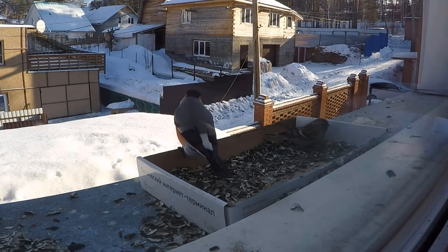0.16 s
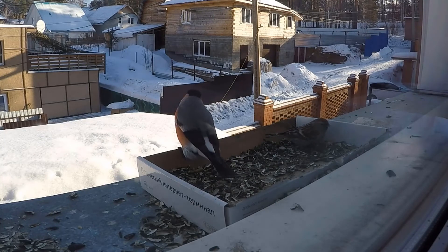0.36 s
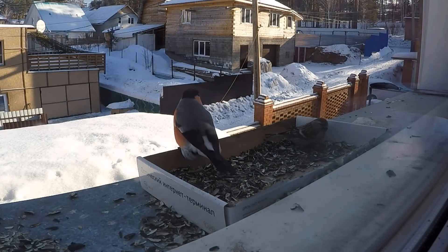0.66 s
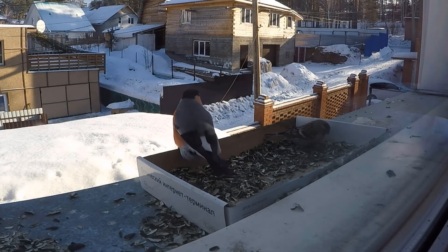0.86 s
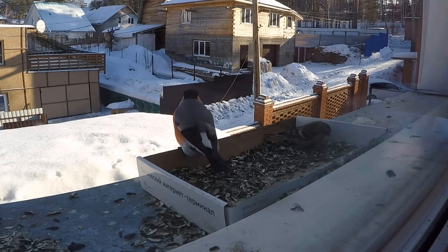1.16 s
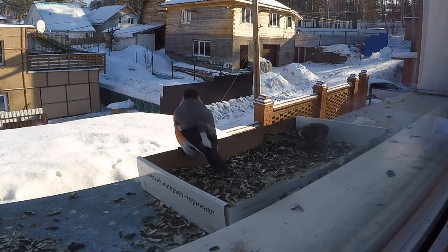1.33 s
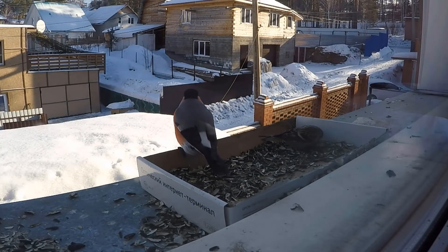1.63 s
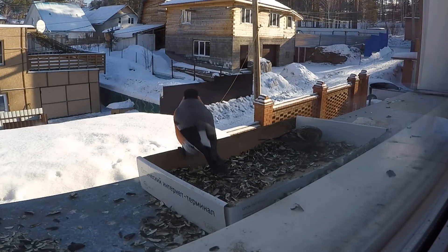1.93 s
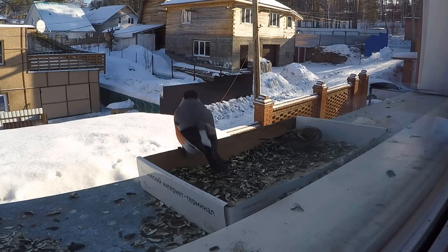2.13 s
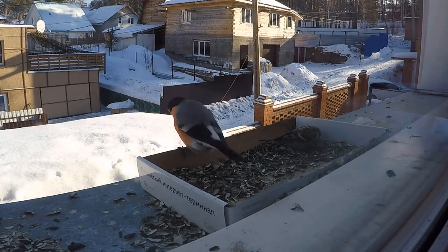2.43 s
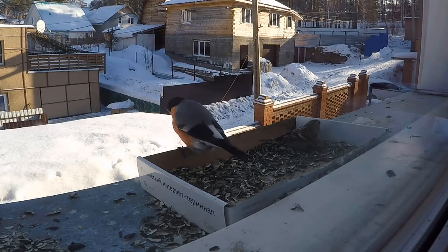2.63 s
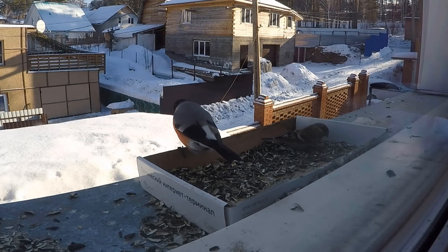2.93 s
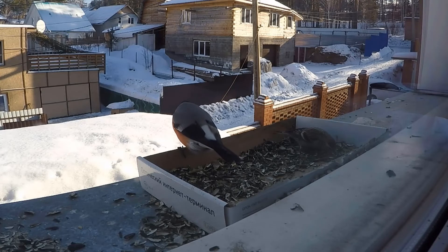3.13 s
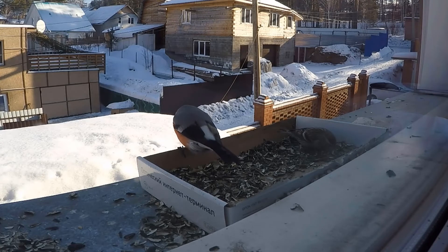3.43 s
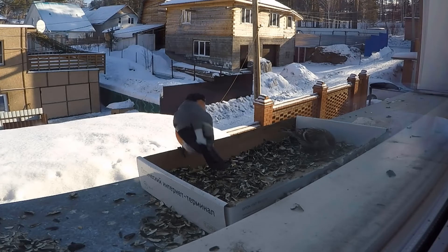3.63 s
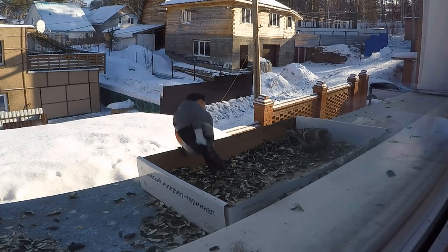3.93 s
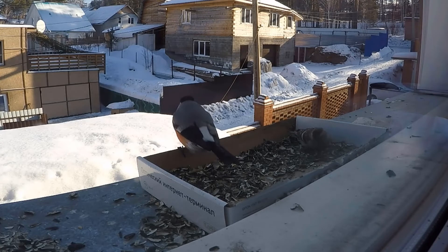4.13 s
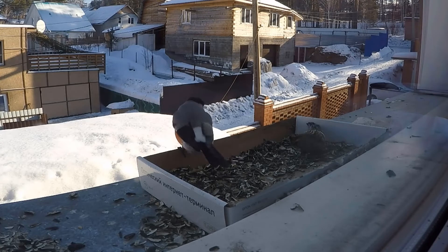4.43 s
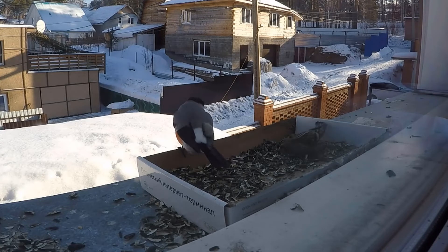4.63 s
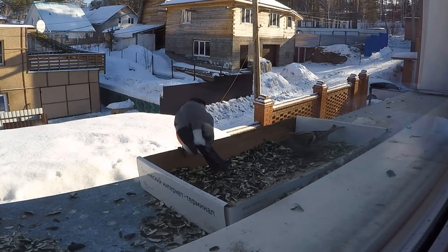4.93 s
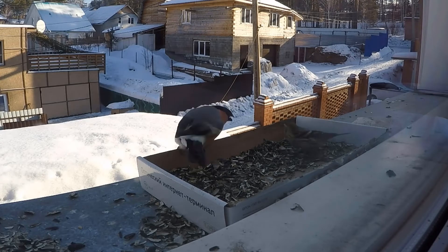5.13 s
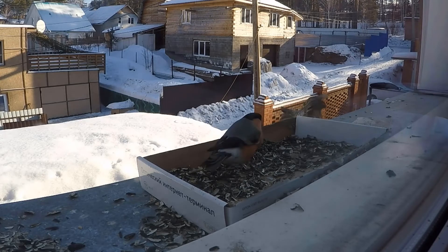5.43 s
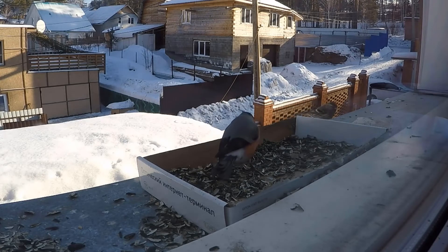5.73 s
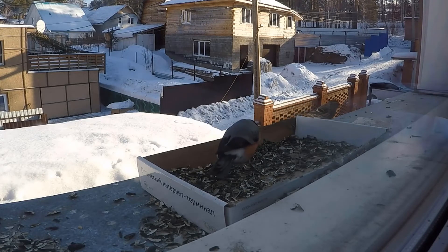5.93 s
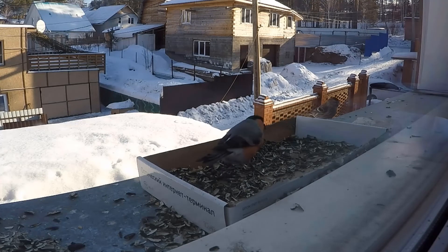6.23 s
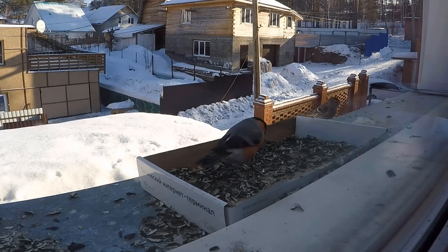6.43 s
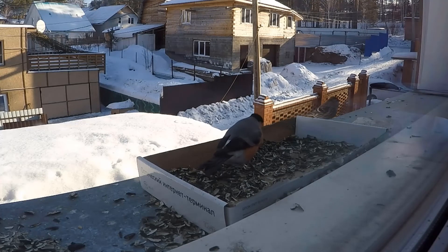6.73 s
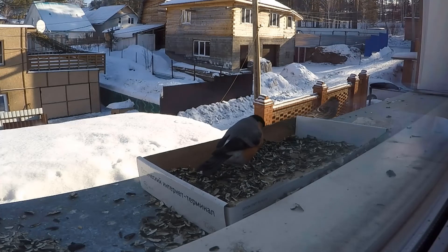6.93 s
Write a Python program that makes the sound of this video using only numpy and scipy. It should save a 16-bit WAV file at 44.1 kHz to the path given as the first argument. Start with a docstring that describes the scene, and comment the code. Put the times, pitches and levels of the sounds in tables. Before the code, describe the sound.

Close at a window feeder, small birds crack seeds with dry snaps and light taps on the tray, husks rustling between. A quiet low hum and street hiss sit behind. After five seconds a burst of scrabbling, a short hoarse squeak and rapid wing flutter come with heavy air thumps. Then only a few faint pecks remain in wind rumble.

```python
"""Small birds at a window feeder

Small birds peck, hop and crack seeds in a feeder tray just outside a window; one squeaks and flutters.
Beaks snap husks (short noise bursts ringing at a pitch) and knock the tray (a bank of decaying sines).
Loose husks rustle as grainy filtered noise, and wing strokes puff and hiss. Wind buffets the microphone
as swelling low noise; low thumps of air are short swings of pressure, from wind gusts and wing beats.
A far machine hums on two tones over street hiss."""
import sys
import numpy as np
from scipy import signal
from scipy.fft import rfft, irfft, next_fast_len
from scipy.io import wavfile
from scipy.ndimage import map_coordinates

SR = 44100
rng = np.random.default_rng(int(sys.argv[2]) if len(sys.argv) > 2 else 0)


def store_wav(level_fs):
    """Save 16-bit WAV to argv[1]."""
    pcm = np.round(np.clip(np.atleast_2d(level_fs), -1, 1) * 32767)
    wavfile.write(sys.argv[1], SR, pcm.T.astype(np.int16))


N = 311346


def amp(db):
    """Gain of a level in dB."""
    return 10 ** (np.asarray(db) / 20)


def unit(x):
    """x at rms 1."""
    return x / np.sqrt(np.mean(x ** 2) + 1e-20)


def curves(rows):
    """One value per sample for each column after the time."""
    s, *cols = np.transpose(rows)
    return [np.interp(np.arange(N) / SR, s, c) for c in cols]


def wobble(rate):
    """A smooth random curve, rate knots a second."""
    knots = rng.standard_normal(int(N * rate / SR) + 4)
    return map_coordinates(knots, [np.arange(N) * rate / SR])


def coloured(points):
    """Noise of rms 1 shaped by a (Hz, dB) spectrum, drawn straight over log frequency."""
    m = next_fast_len(N + 8192)
    f, v = np.transpose(points)
    hz = np.fft.rfftfreq(m, 1 / SR)
    gain = amp(np.interp(np.log(hz + 1), np.log(f + 1), v, left=-120, right=-120))
    return unit(irfft(rfft(rng.standard_normal(m)) * gain, m)[:N])


def band(x, lo_hz, hi_hz, order=2):
    """Causal band-pass."""
    sos = signal.butter(order, [lo_hz, min(hi_hz, .49 * SR)], "band", fs=SR, output="sos")
    return signal.sosfilt(sos, x)


def gritty(count, grit_db):
    """Noise of rms 1 whose level jumps every 40 samples (0.9 ms), as many small grains."""
    jumps = np.minimum(rng.exponential(1, count // 40 + 1), 3)
    jumps = np.repeat(jumps, 40)[:count]
    return unit(amp(grit_db * jumps) * rng.standard_normal(count))


def stroke(length, rush=0.54):
    """Level of one rub or wing stroke: a quick rise and a slower fall."""
    count = round(np.clip(length, .005, .2) * SR)
    u = np.arange(count) / count
    return np.sin(np.pi * u ** rush) ** 1.28  # a smaller rush peaks earlier


def street():
    """Street hiss: steady broad noise, heaviest in the bass, with a slight drift in level."""
    # street colour: [f/Hz, relative level/dB]
    street_spectrum = [(12, -41), (20, -12.5), (70, 0), (130, -7.5), (172, -15.5), (319, -16), (430, -22),
                       (580, -20), (740, -27), (950, -23.5), (1300, -27.5), (4800, -35.5), (12000, -39.5),
                       (14500, -42), (16000, -66)]
    return amp(-50.5 + 0.67 * wobble(3.145)) * coloured(street_spectrum)


def hum():
    """A far machine: two low tones that waver in level and phase."""
    # hum course before the wavering: [t/s, lower tone f/Hz, lower tone level/dB, upper tone level/dB]
    hum_course = [(0, 124, -54.5, -59), (1.2, 125, -53.5, -55.5), (1.4, 123, -46, -65),
                  (2.1, 128, -50.5, -68), (2.9, 122, -53.5, -55.5), (3.3, 122, -54, -56),
                  (3.9, 122, -61.5, -54), (4.3, 122, -77, -92)]
    upper_hz = 143.4
    low_hz, low_db, high_db = curves(hum_course)
    low_phase = 2 * np.pi * np.cumsum(low_hz) / SR + 1.47 * wobble(10)
    high_phase = 2 * np.pi * upper_hz * np.arange(N) / SR + 1.67 * wobble(11)
    low = amp(low_db + 1.45 * wobble(11)) * np.sin(low_phase)
    high = amp(high_db + 5.3 * wobble(7.5)) * np.sin(high_phase)
    return low + high


def breeze():
    """Wind on the microphone: lumps of low pressure noise that swell and sink unevenly."""
    # lump colour ahead of the band-pass: [f/Hz, relative level/dB]
    gust_spectrum = [(7.1, -37), (12, -3), (32, 1), (52, -1), (79, -7.5), (169, -25.5), (250, -54),
                     (550, -120)]
    # wind strength before the random swelling: [t/s, level/dB]
    wind_course = [(0, -53), (.5, -50), (.75, -41), (1, -49), (1.9, -54), (2.02, -38.5), (2.4, -43),
                   (2.5, -49), (4.08, -55.5), (4.2, -39), (4.7, -44), (5.03, -30.5), (5.15, -38.5),
                   (5.35, -33), (5.7, -36.5), (6.35, -35.5), (6.47, -48), (7.06, -51.5)]
    lumps = unit(band(coloured(gust_spectrum), 18.0, 115, order=1))
    level_db = curves(wind_course)[0] + 7.0 * np.tanh(wobble(10.0))
    return amp(level_db) * lumps


def thumps():
    """Low thumps of air, each a dip, push and dip; a little flutter rides on the strongest."""
    # wind gusts, and wing beats around 5.42-5.57 s: [t/s of the swell's middle, swell level/dB, period/s]
    air_thumps = [(0.134, -34.5, 0.023), (.301, -34, 0.021), (0.678, -34, 0.029), (.788, -30, 0.033),
                  (0.892, -23.5, 0.025), (1.547, -32, 0.021), (2.005, -32.5, 0.036), (2.405, -35, 0.022),
                  (4.15, -29.5, 0.022), (4.25, -24.5, 0.022), (4.513, -22.5, 0.02), (4.773, -25.5, 0.019),
                  (4.967, -25, 0.016), (5.223, -26, 0.025), (5.283, -22.5, 0.021), (5.31, -22, 0.02),
                  (5.418, -17.5, 0.0116), (5.443, -17, 0.027), (5.489, -16, 0.019), (5.532, -17, 0.021),
                  (5.572, -21.5, 0.015), (5.719, -16, 0.021), (5.741, -18.5, 0.014), (6.031, -22.5, .017),
                  (6.197, -25, 0.018), (6.287, -26, 0.025), (6.866, -29.5, 0.028), (7.046, -15, 0.014)]
    spread, rebound_rad = 0.69, 0.3  # swell width in periods; the dip after the push is the deeper one
    out, t = np.zeros(N + SR), np.arange(-SR // 10, SR // 10) / SR
    for s, db, period in air_thumps:
        swell = amp(db) * np.exp(-(t / (spread * period)) ** 2)
        swing = np.cos(2 * np.pi * t / period + rebound_rad)
        flutter = unit(band(rng.standard_normal(len(t)), 104, 232))
        start = round(s * SR) - SR // 10
        out[start:][:len(t)] += swell * (swing + 0.5 * swell * flutter)
    return out[:N]


def nook(x):
    """The window nook answers with a short dull tail of decaying noise."""
    t = np.arange(SR // 4) / SR
    tail = band(rng.standard_normal(len(t)), 250, 1850, order=1)
    tail = tail * amp(-60 * t / 0.1) * (1 - np.exp(-t / 0.00031))  # 60 dB down in 0.1 s
    return signal.fftconvolve(x, tail / np.linalg.norm(tail))[:N]


def ticks(count=30):
    """Faint stray ticks of husks settling: tiny decaying noise bursts at random moments."""
    out, t = np.zeros(N + SR), np.arange(SR // 50) / SR
    for u, size, tone in rng.random((count, 3)):
        burst = amp(-60 * t / 0.042) * rng.standard_normal(len(t))
        tick = band(burst, 1500 + 4000 * tone, 5000 + 10000 * tone, order=1)
        out[int(u * N):][:len(t)] += amp(-59 + 8 * size) * tick
    return out[:N]


def wings():
    """Each stroke pushes a dull puff of air and brushes feather on feather."""
    # wing strokes: [t/s, puff level/dB, feather hiss over the puff/dB]
    wing_strokes = [(5.342, -44, 0.5), (5.379, -46, 3.5), (5.409, -43, -5), (5.443, -47, -3),
                    (5.474, -42, -5.5), (5.51, -44.5, -0.5), (5.549, -40.5, -6), (5.573, -46, -3),
                    (5.605, -51, -2.5), (5.64, -58.5, -13)]
    out, shape = np.zeros(N), stroke(0.042, rush=0.38)
    for s, db, feather_db in wing_strokes:
        air = gritty(len(shape), grit_db=2.5)
        puff = unit(band(air, 210, 600, order=1))
        hiss = unit(band(air, 770, 6600, order=1) + 0.62 * band(air, 5300, 22600))
        out[round(s * SR):][:len(shape)] += amp(db) * shape * (puff + amp(feather_db) * hiss)
    return out


def rustle():
    """Grains ring a resonance of the husks and the tray wall, with a hiss on top."""
    # beak, claws or feathers dragged through the husks:
    # [t/s, length/s, level/dB, colour f/Hz, hiss over the narrow body/dB]
    rubs = [(1.559, 0.047, -52, 1800, -4), (1.566, 0.014, -46, 5400, -13), (1.595, 0.023, -56, 3520, 3),
            (1.611, 0.025, -50.5, 2570, 6.5), (1.652, 0.035, -53.5, 900, 0),
            (1.697, 0.053, -62.5, 2650, 9.5), (1.841, 0.011, -53.5, 1230, -19),
            (2.393, 0.03, -61, 2980, 18), (2.405, 0.044, -55.5, 1110, -12), (3.073, 0.014, -59, 2320, -9),
            (3.093, 0.033, -57, 2640, -6), (3.133, 0.049, -63.5, 2850, 8), (3.181, 0.069, -52, 2480, -3),
            (3.704, 0.039, -55.5, 2700, -41), (4.034, 0.036, -60, 2600, -22),
            (4.206, 0.096, -47, 2720, -44), (4.234, 0.024, -59, 6000, 9.5),
            (4.312, 0.0072, -39.5, 4800, 3.5), (4.285, 0.056, -48, 5970, -8),
            (4.602, 0.11, -57.5, 2500, -4), (4.622, 0.014, -46.5, 6360, -1), (4.644, 0.033, -58, 3160, 6.5),
            (4.675, 0.018, -50, 9000, -1), (4.703, 0.061, -59, 5040, 4), (5.148, 0.095, -48, 856, -6),
            (5.173, 0.019, -54, 2020, -12), (5.213, 0.07, -44.5, 6600, 5), (5.235, 0.062, -39.5, 2300, -4),
            (5.274, 0.014, -42, 2300, 0), (5.295, 0.037, -43.5, 1280, 13.5), (5.322, 0.053, -49.5, 1800, 2),
            (6.175, 0.071, -64, 1470, 13), (6.227, 0.066, -66.5, 12500, 11), (6.285, 0.023, -53, 1620, -12),
            (6.412, 0.011, -54, 676, -30)]
    out = np.zeros(N + SR)
    for s, length, db, hz, hiss_db in rubs:
        shape = stroke(length)
        grains = gritty(len(shape), grit_db=5.5)
        narrow = unit(band(grains, hz / 1.31, hz * 1.21))
        wide = unit(band(grains, hz / 3, hz * 2.36))
        body = narrow + amp(0.078 * min(hiss_db, 0)) * wide  # a rub with less hiss is narrower too
        hiss = unit(band(gritty(len(shape), grit_db=3.0), 2100, 10600, order=1))
        out[round(s * SR):][:len(shape)] += amp(db) * shape * (body + amp(hiss_db) * hiss)
    return out[:N]


def squeaks():
    """Short hoarse notes: a tone that bends, with unsteady pitch and strength, and its octave."""
    # notes: [t/s, length/s, first f/Hz, middle f/Hz, last f/Hz, level before a 7 dB lift/dB, roughness]
    notes = [(5.214, 0.0864, 2394, 2384, 2270, -37, 0.041), (5.333, 0.088, 1650, 1130, 1330, -50, 1.1)]
    rise_s, fall_s = 0.027, 0.0068
    out, t = np.zeros(N), np.arange(N) / SR
    for s, length, first_hz, middle_hz, last_hz, db, rough in notes:
        hz = np.interp(t - s, [0, length / 2, length], [first_hz, middle_hz, last_hz])
        shape = np.clip(np.minimum((t - s) / rise_s, (s + length - t) / fall_s), 0, 1) ** 2
        phase = 2 * np.pi * np.cumsum(hz * (1 + .09 * rough * wobble(400))) / SR
        strength = 1 + rough * np.tanh(wobble(450))
        overtone_db = -19 * (1.5 - rough / 2)  # a rougher note has more of its octave
        tone = np.sin(phase) + amp(overtone_db) * np.sin(2 * phase)
        out += shape * amp(db + 7) * strength * tone
    return out


def knock(t, hz, modes):
    """The tray rings as decaying sines; a brighter, lighter contact moves its low modes less."""
    light_touch = 0.56
    ringing = 0
    for c, level, ring in modes:
        decay = amp(level + rng.normal(0, 3) - 60 * t / ring)
        mode = np.sin(2 * np.pi * c * rng.normal(1, .02) * t)
        ringing = ringing + decay * min(1, c / hz) ** light_touch * mode
    return ringing * (1 - np.exp(-t / 0.0014))  # the board takes a moment to swing


def pecks():
    """Each beak or claw contact: a husk snaps, bits scatter after it and the tray rings."""
    # contacts: [t/s, overall level/dB, husk pitch f/Hz, treble gain/dB, tray knock gain/dB]
    contacts = [(0.628, -38, 10500, -4, -16), (0.969, -45.5, 9100, 10.5, -2), (1.335, -44, 2830, -12, -20),
                (1.559, -39, 3000, -8, -16), (1.632, -28.5, 4970, -16, -18), (1.633, -14.5, 2700, -14, -13),
                (1.636, -18, 598, -30, -11), (1.646, -28, 590, -21, -19), (1.768, -38, 3470, -24, -13),
                (2.125, -45, 3850, -19, -24), (2.4, -34.5, 4160, 8, -18), (2.524, -44, 1800, -10, -25),
                (2.93, -38, 5570, -12, -13), (3.181, -26.5, 2460, -8, -7), (3.192, -25.5, 3070, 1, -8.5),
                (3.836, -31, 2650, -5, -36), (4.2954, -21.5, 7760, -16, -17), (4.302, -37, 7540, -10, -33),
                (4.423, -43, 2820, 5.5, -30), (4.702, -25.5, 2930, 4, -24), (4.7, -25.5, 6100, -13, -27),
                (4.713, -23.5, 5400, -14, -23), (4.717, -34, 7300, -5, -23), (4.771, -23.5, 3200, -11, -30),
                (5.273, -25, 2310, 13.5, -7), (5.286, -20, 9000, 0, -17), (5.301, -18, 1190, -20, -43),
                (5.307, -18, 3330, 2, -24), (5.314, -30, 9000, 5, -23), (5.345, -32, 3000, 4, -22),
                (5.382, -33, 6460, 0, -10), (5.446, -31, 4470, 2, -35), (5.521, -31.5, 10000, -9, -9),
                (5.809, -49, 9400, 13, -28), (6.134, -40, 3420, -31, -34), (6.189, -34.5, 10500, -15, -16),
                (6.24, -27, 12000, -7, -30), (6.314, -46, 11000, 7, -25), (6.411, -40, 990, -14, -16),
                (6.446, -53, 11000, 14, -32.5), (6.622, -30.5, 3680, -32.5, -19)]
    # tray modes before each contact's small random shifts: [f/Hz, level/dB, time to fall 60 dB/s]
    tray_modes = [(288, 5, 0.032), (345, 0, 0.03), (520, -1, 0.032), (640, 0, 0.028), (880, -6, 0.022),
                  (1020, -3, 0.024), (1220, -2, 0.028), (1800, -6, 0.024), (2060, -5, 0.026),
                  (2650, -6, 0.03)]
    scatter_t60_s = 0.059  # bits of husk that fly after a snap
    out, t = np.zeros(N + SR), np.arange(SR // 5) / SR
    for s, db, hz, treble_db, knock_db in contacts:
        snap = amp(-60 * t / 0.006) * rng.standard_normal(len(t))
        snap = snap / np.abs(snap).max()
        scatter = amp(-18.0 - 60 * t / scatter_t60_s) * gritty(len(t), grit_db=6.5)
        push = snap + scatter
        shell = band(snap, hz / 1.12, hz * 1.1, order=1)  # rings briefly at its pitch
        husk = 1.5 * shell + band(push, hz / 1.8, hz * 1.04, order=1)
        treble = amp(treble_db) * band(push, 2300, 10600, order=1)
        husk = husk / np.abs(husk).max() + treble
        tray = knock(t, hz, tray_modes)
        out[round(s * SR):][:len(t)] += amp(db) * (husk + amp(knock_db) * tray)
    return out[:N]


def scene():
    """Everything at one microphone; only the tray sounds stir the nook."""
    background = street() + hum()
    moving_air = breeze() + thumps()
    tray = ticks() + rustle() + pecks()
    return (background + moving_air + amp(-10) * nook(tray) + wings() + squeaks() + tray)[None]


def record(dry):
    """The microphone has a narrow dip in the treble; nothing is kept above the band limit."""
    dip_hz, dip_width_hz, dip_db, top_hz = 10350, 320, -4, 15900
    m = next_fast_len(N + 8192)
    hz = np.fft.rfftfreq(m, 1 / SR)
    dip = amp(dip_db * np.exp(-((hz - dip_hz) / dip_width_hz) ** 2))
    return irfft(rfft(dry, m) * dip * (hz < top_hz), m)[:, :N]


dry = scene()
out = record(dry)
store_wav(out)
```